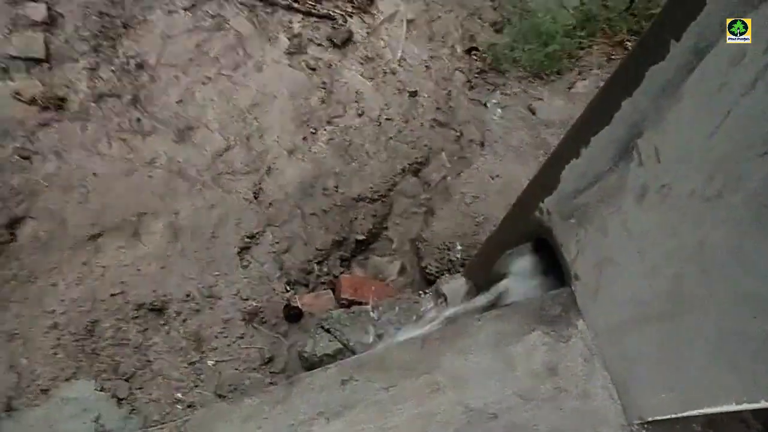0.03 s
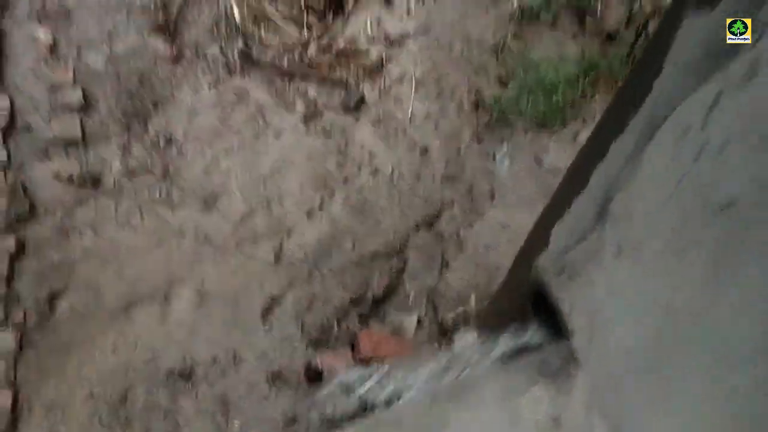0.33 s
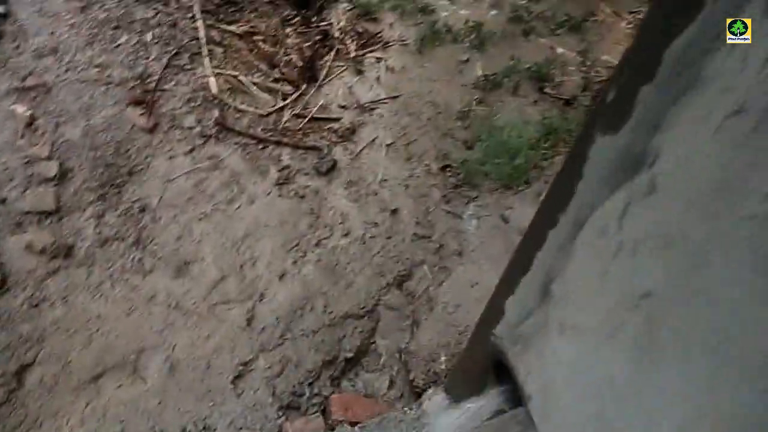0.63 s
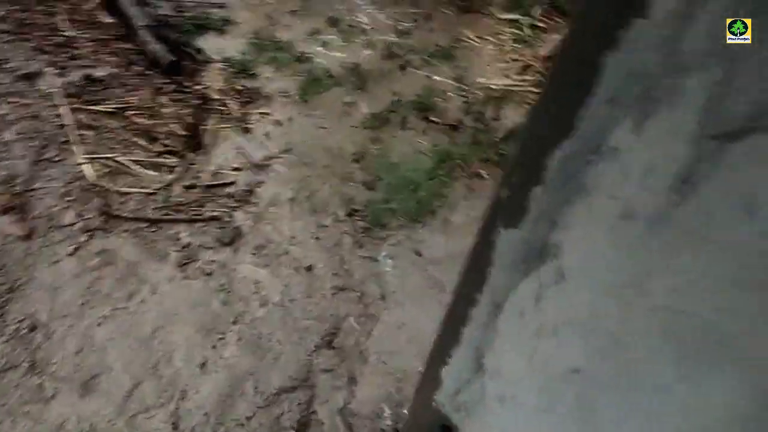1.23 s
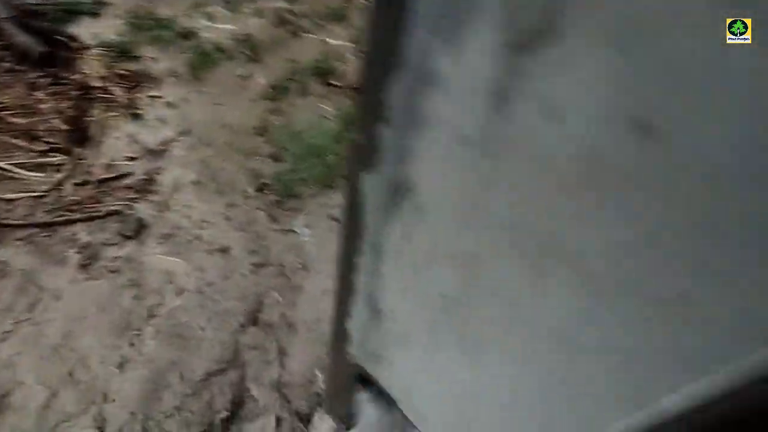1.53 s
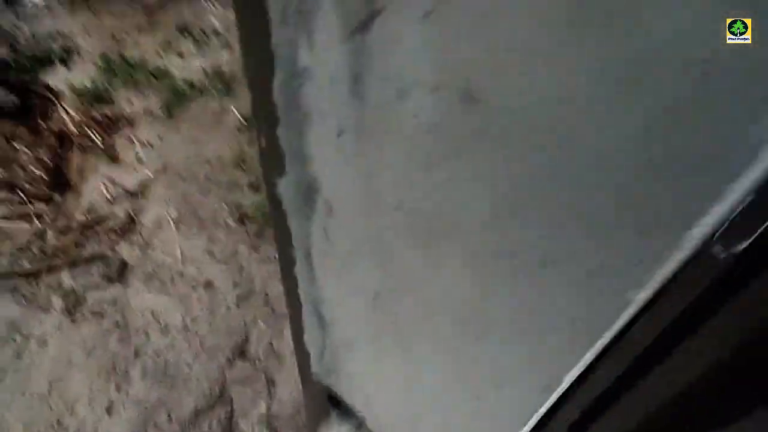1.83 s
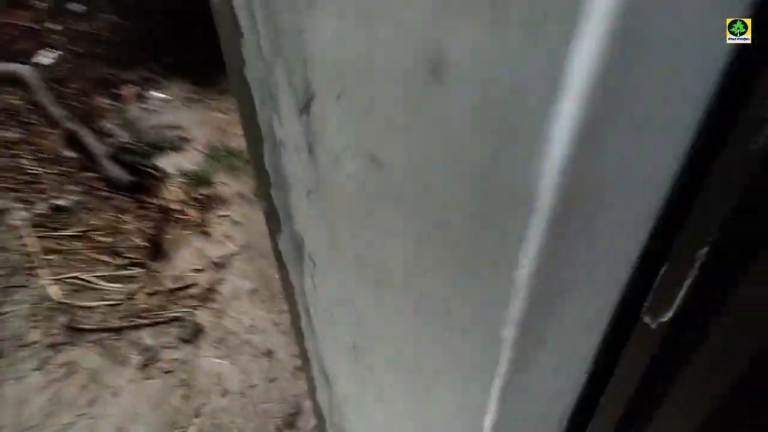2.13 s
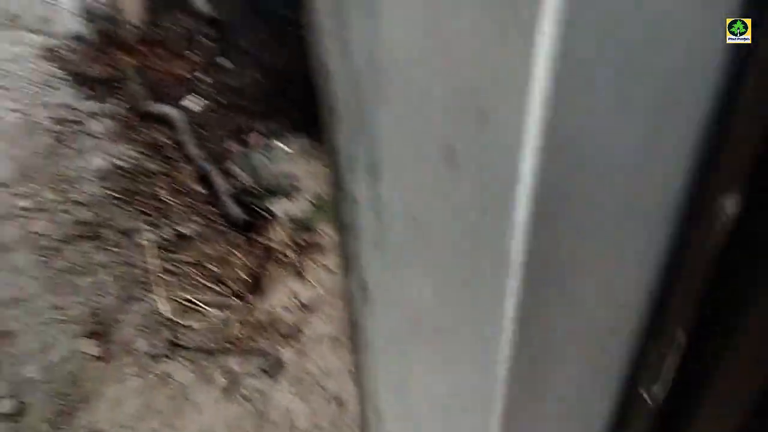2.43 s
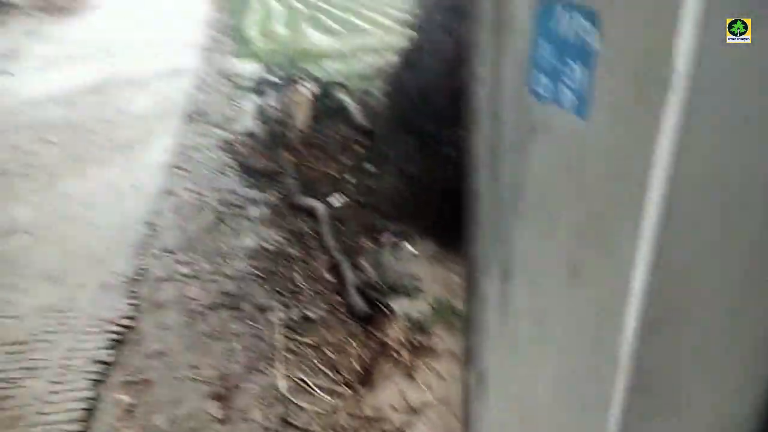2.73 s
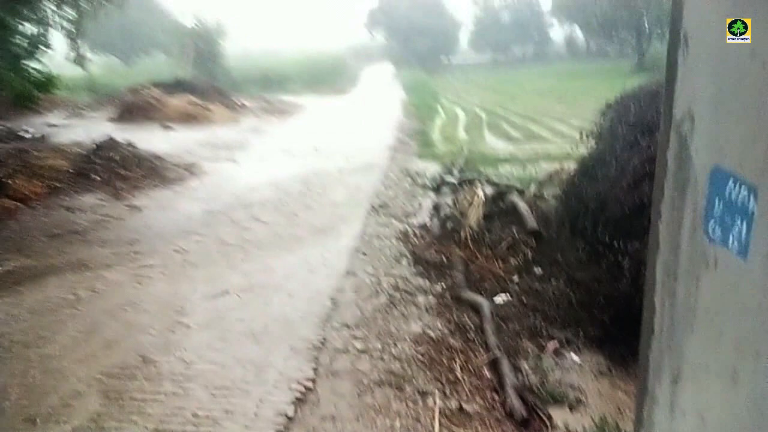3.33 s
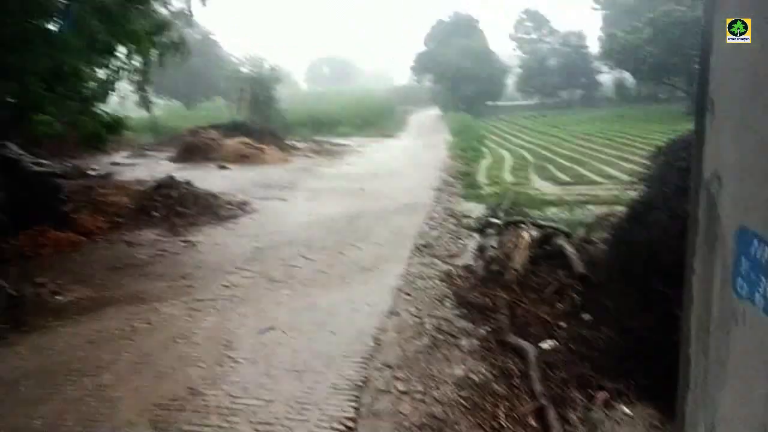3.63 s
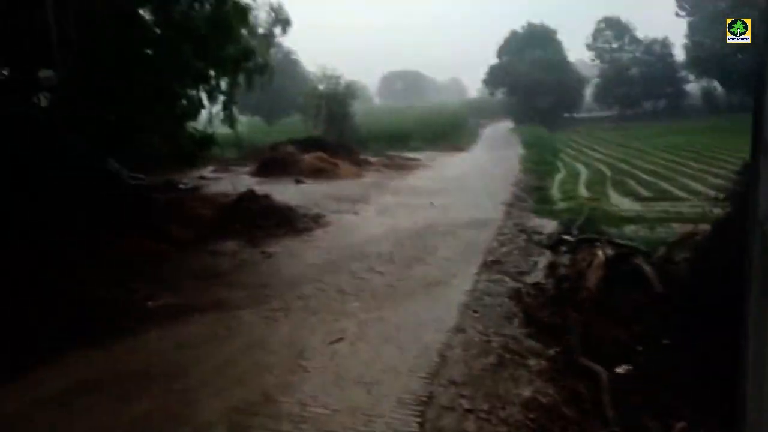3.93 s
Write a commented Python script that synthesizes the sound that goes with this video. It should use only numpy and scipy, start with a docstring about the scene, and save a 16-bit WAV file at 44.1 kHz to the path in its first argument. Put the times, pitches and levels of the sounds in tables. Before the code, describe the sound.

Heavy rain with water splashing from a drain, close drips and wind on the microphone.

```python
"""Heavy rain on a village yard, microphone in a doorway, the water mostly to the left. From the start
a drain splashes and gurgles onto the ground and runoff patters into puddles. Fat drips smack down
close by, briefly answered by the house wall; thin trickles ring and spurts slap the ground. Wind
buffets the microphone from about 0.7 s, harder on the right. The patter thickens by 1.6 s; the wind
drops after 2 s and returns at the very end."""
import sys
import numpy as np
from scipy import signal
from scipy.fft import rfft, irfft, next_fast_len
from scipy.io import wavfile
from scipy.ndimage import uniform_filter1d, map_coordinates

SR = 44100
rng = np.random.default_rng(int(sys.argv[2]) if len(sys.argv) > 2 else 0)


def put_to_file(sound):
    """Save the sound as 16-bit audio at rate SR, in the file named by the first command-line argument."""
    columns = np.atleast_2d(sound).T  # one column per channel
    safe = np.clip(columns, -1, 1)
    whole_steps = np.round(safe * 32767)
    wavfile.write(sys.argv[1], SR, whole_steps.astype(np.int16))


N = 176400

# Course of each steady source at the microphone: t/s, relative level/dB
WIND_LEVEL = [(0, -42.5), (.28, -44), (.6, -38), (.8, -35.5), (1.13, -38.5), (1.25, -37), (1.66, -37.5),
              (1.78, -40.5), (2.3, -52.5), (2.55, -48.5), (3.55, -55), (4, -38.5)]
RAIN_LEVEL = [(0, -45), (1, -46.5), (1.3, -43.5), (2.75, -45.5), (3.3, -42.5)]
SPLASH_LEVEL = [(0, -40.5), (.65, -38.5), (1.01, -39), (1.45, -36), (1.58, -37.5), (2.6, -40), (4, -41.5)]
GURGLE_LEVEL = [(0, -50.5), (.37, -49), (.68, -52.5), (.81, -40.5), (.99, -58), (1.1, -46), (1.37, -43),
                (1.47, -50.5), (1.62, -41.5), (1.95, -48.5), (2.15, -57.5), (2.45, -60.5), (2.56, -47.5),
                (2.9, -56.5)]
PATTER_LEVEL = [(0, -54.5), (.75, -46.5), (1.4, -54), (1.62, -44.5), (4, -44.5)]
# Tone of each source from the doorway: f/Hz, relative level/dB
WIND_SPECTRUM = [(25, -41), (45, -22.5), (70, -5.5), (125, 2.5), (250, -10.5), (360, -14), (700, -35.5),
                 (1500, -56)]
BUFFET_SPECTRUM = [(25, -43), (70, -2.5), (150, 1), (280, -6.5), (420, -9.5), (600, -30), (1500, -63)]
RAIN_SPECTRUM = [(60, -16), (150, -7), (850, -10.5), (2700, -2), (4500, 4.5), (5600, 4), (6800, 7.5),
                 (8000, 4.5), (9500, 7.5), (10400, 5.5), (11200, -8.5)]
SPLASH_SPECTRUM = [(1200, -29), (3100, -6.5), (4500, 3), (5200, 0.5), (5800, -9), (6600, 6), (7300, 4),
                   (8200, -7), (11000, -34.5)]
BUBBLE_SPECTRUM = [(400, -42), (660, -10), (800, -2), (1220, 2), (1330, -2), (1500, -8), (2500, -24)]
SLOSH_SPECTRUM = [(600, -27), (800, -3.5), (1100, -2), (1550, -7.5), (2100, 0), (3300, 1), (4200, -2),
                  (6000, -23)]
PATTER_SPECTRUM = [(900, -24.5), (1400, -7), (1750, -1.5), (2300, -2), (3200, -6.5), (4500, -13)]
# Decay of the answer from wall and doorway: f/Hz, T60/s
WALL_DECAY = [(200, 0.09), (1500, 0.18), (10000, 0.048)]
# Fat drips close by: t/s, relative level/dB, ring f/Hz
FAT_DRIPS = [(.168, -21, 3730), (.928, -19.5, 3700), (1.094, -26, 4600), (1.354, -22, 7110),
             (1.761, -17, 1150), (1.791, -14, 2030), (1.943, -21.5, 1710), (2.057, -20, 3900),
             (2.650, -27, 1690), (2.685, -23, 1460), (3.213, -26, 1590), (3.297, -18, 1600)]
# Trickles ringing in puddles: start t/s, length/s, f/Hz, relative level/dB
PUDDLE_TRICKLES = [(0.297, 0.12, 1344, -47.5), (0.768, .12, 2060, -44), (1.26, 0.76, 1235, -47.5),
                   (1.678, 0.17, 2730, -43), (2.033, 0.107, 3750, -42), (2.373, 0.15, 1640, -46),
                   (2.607, 0.27, 1840, -47), (2.668, 0.336, 1397, -46.5), (3.053, 0.39, 1667, -45.5),
                   (3.557, 0.13, 3355, -45.5)]
# Spurts slapping the ground: peak t/s, length/s, centre f/Hz, relative level/dB
GROUND_SPURTS = [(0.319, 0.066, 3280, -39.5), (0.621, 0.075, 6600, -36.5), (0.788, 0.13, 2730, -40.5),
                 (0.799, .03, 5900, -35.5), (1.08, 0.081, 3500, -37), (1.095, 0.093, 7100, -37.5),
                 (1.332, 0.053, 3650, -37), (2.263, 0.041, 5540, -39), (2.52, 0.058, 970, -42)]
# Sudden buffets on the microphone: peak t/s, length/s, relative level/dB
MIC_BUFFETS = [(0.668, 0.035, -33), (0.735, 0.071, -29.5), (0.811, 0.064, -34), (1.453, 0.039, -32.5)]

GUST_ABOVE_DB = -43.5  # stronger wind leans to the right
HOLLOW_HALF_DEPTH_HZ = 7700
DRIP_DB, DRIP_LOW_CUT_HZ = -9.5, 760
RING_T60_S, RING_WIDTH_OCT = 0.026, 0.3
CRACK_DB, CRACK_T60_S = -1, 0.0068
SPRAY_DB, SPRAY_T60_S = -13, 0.073
TRICKLE_FADE_S = 0.018
TRICKLE_WIDTH, TRICKLE_WANDER = 0.081, 0.02  # shares of the pitch
SPURT_RISE_SHARE, SPURT_WIDTH_OCT = 0.41, 0.32
BAND_LIMIT_HZ = 11200


def amp(db):
    """Decibels to gain."""
    return 10 ** (np.asarray(db) / 20)


def unit(x):
    """Scale to rms 1."""
    return x / np.sqrt(np.mean(x ** 2) + 1e-20)


def hiss():
    """White noise, unrelated in the two channels."""
    return rng.standard_normal((2, N))


def over_frequency(points, hz):
    """Interpolate (f/Hz, value) points on a log axis."""
    freqs, values = np.transpose(points)
    return np.interp(np.log(hz + 1), np.log(freqs + 1), values)


def over_time(points):
    """Interpolate (t/s, value) points at every sample."""
    times, values = np.transpose(points)
    return np.interp(np.arange(N) / SR, times, values)


def wobble(rate):
    """A smooth random curve, rate knots a second."""
    knots = rng.standard_normal(int(N * rate / SR) + 4)
    return map_coordinates(knots, [np.arange(N) * rate / SR])


def bell(hz, centre_hz, width_oct):
    """A Gaussian band on an octave axis."""
    return np.exp(-.5 * (np.log2((hz + 1) / centre_hz) / width_oct) ** 2)


def filtered(x, response):
    """Filter x by a response given as a function of frequency."""
    size = next_fast_len(N + SR // 2)
    return irfft(rfft(x, size) * response(np.fft.rfftfreq(size, 1 / SR)), size)[..., :N]


def coloured(x, spectrum):
    """x through a causal filter with the given spectrum, at rms 1."""
    def minimum_phase(hz):
        cepstrum = irfft(np.log(amp(over_frequency(spectrum, hz))))
        half = len(cepstrum) // 2
        return np.exp(rfft(np.r_[cepstrum[0], 2 * cepstrum[1:half]], len(cepstrum)))
    return unit(filtered(x, minimum_phase))


def panned(x, left_db):
    """Tip a stereo pair to the left, or to the right if negative."""
    return np.array([x[0] * amp(left_db / 2), x[1] * amp(-left_db / 2)])


def drops(rate, lo_hz, hi_hz, cycles, spread_db, glide, samples):
    """Drops or bubbles all around the microphone: random damped sines that may glide up."""
    pitch, weight, onset, bearing, _ = rng.random((int(rate * N / SR), 5)).T
    hz = lo_hz * (hi_hz / lo_hz) ** pitch[:, None]
    t = np.arange(samples) / SR
    age = hz * t / cycles
    strength = amp(-spread_db * np.log(np.maximum(weight[:, None], .01))) * np.sqrt(hz)
    phase = 2 * np.pi * hz * t * (1 + glide * np.minimum(age, 2) / 2)
    rings = strength * np.exp(-np.pi * age) * np.sin(phase)
    start = (onset * N).astype(int)
    left = start + SR // 2000
    right = start + (bearing * SR / 1000).astype(int)  # within 0.5 ms of the left
    slots = [(arrival[:, None] + np.arange(samples)).ravel() for arrival in (left, right)]
    return unit(np.array([np.bincount(slot, rings.ravel(), N)[:N] for slot in slots]))


def hollow(x, depth_db):
    """Narrow resonances that come and go in the water, a few tenths of a second each."""
    spectra = signal.stft(x, nperseg=2048)[2]
    peaks = rng.standard_normal(spectra.shape[1:])
    for bins, frames in ((5, 8), (3, 4)):
        peaks = uniform_filter1d(peaks, bins, axis=0)
        peaks = uniform_filter1d(peaks, frames, axis=1, mode="wrap")
    taper = 1 / (1 + np.fft.rfftfreq(2048, 1 / SR)[:, None] / HOLLOW_HALF_DEPTH_HZ)
    gain = amp(depth_db * taper * unit(peaks))
    return unit(signal.istft(spectra * gain, nperseg=2048)[1][:, :N])


def wall(x, wet_db):
    """Add the short answer of house wall and doorway, different in each channel."""
    hz, t, spectra = signal.stft(rng.standard_normal((2, SR // 4)), SR, nperseg=256)
    decay = amp(-60 * t / over_frequency(WALL_DECAY, hz)[:, None])
    tail = signal.istft(spectra * decay, SR, nperseg=256)[1]
    tail /= np.linalg.norm(tail[0])
    return x + amp(wet_db) * signal.fftconvolve(x, tail, axes=1)[:, :N]


def wind():
    """Air rumbles on both microphone ports; strong gusts and sudden buffets hit the right one harder."""
    t = np.arange(N) / SR
    level_db = over_time(WIND_LEVEL)
    gust_db = np.maximum(level_db - GUST_ABOVE_DB, 0)
    air = coloured(rng.standard_normal(N) + amp(-9.0) * hiss(), WIND_SPECTRUM)
    bumps = sum(amp(db) * np.exp(-(2 * (t - peak) / length) ** 2) for peak, length, db in MIC_BUFFETS)
    buffets = bumps * coloured(rng.standard_normal(N) + amp(-4.0) * hiss(), BUFFET_SPECTRUM)
    rumble = panned(air, left_db=-.7 * gust_db) * amp(level_db + 1.3 * wobble(16))
    return rumble + panned(buffets, left_db=-12.0)


def rain():
    """Tiny impacts on the mud and concrete of the yard, over the hiss of far rain."""
    ticks = drops(rate=2500, lo_hz=820, hi_hz=10600, cycles=1.12, spread_db=2, glide=0, samples=128)
    sound = coloured(hollow(ticks + amp(0.5) * hiss(), depth_db=5.0), RAIN_SPECTRUM)
    return panned(sound, left_db=7.5) * amp(over_time(RAIN_LEVEL) + 6.5 + 1.3 * wobble(21.986))


def drain_splash():
    """Left of the microphone, the jet from the drain breaks up on the ground in uneven fizz."""
    fizz = drops(rate=1500, lo_hz=2450, hi_hz=8930, cycles=4.0, spread_db=2, glide=0.055, samples=192)
    sound = coloured(hollow(fizz + amp(2.0) * hiss(), depth_db=5.5), SPLASH_SPECTRUM)
    level_db = over_time(SPLASH_LEVEL)
    swing_db = 2.02 * (level_db - level_db.mean())
    return panned(sound, left_db=6.0) * amp(level_db.mean() - 0.5 + swing_db + 0.6 * wobble(39.9))


def drain_gurgle():
    """Each surge of the outflow rings large bubbles ahead and sloshes over the stones to the left."""
    surge = amp(over_time(GURGLE_LEVEL) + 1.83 * wobble(29.65))
    bubbles = drops(rate=400, lo_hz=659, hi_hz=1527, cycles=17.5, spread_db=3, glide=0.086, samples=1200)
    bubbles = wall(bubbles, wet_db=-0.5)
    slosh = drops(rate=1200, lo_hz=687, hi_hz=5300, cycles=9.8, spread_db=3, glide=0.052, samples=600)
    bubbles = coloured(hollow(bubbles, depth_db=2.5), BUBBLE_SPECTRUM)
    slosh = coloured(hollow(slosh, depth_db=7.5), SLOSH_SPECTRUM)
    return surge * (amp(-1.0) * panned(bubbles, left_db=-0.5) + amp(2) * panned(slosh, left_db=4.0))


def runoff_patter():
    """Runoff plinks into puddles, well to the left of the doorway."""
    plinks = drops(rate=900, lo_hz=1217, hi_hz=4160, cycles=11.8, spread_db=2.5, glide=0.06, samples=900)
    sound = coloured(hollow(wall(plinks, wet_db=3), depth_db=4), PATTER_SPECTRUM)
    return panned(sound, left_db=12.5) * amp(over_time(PATTER_LEVEL) - 2.5 + 0.56 * wobble(22.2))


def drips():
    """Close to the microphone, each fat drip cracks, rings in its puddle and throws a little spray."""
    size = SR // 5
    t, hz = np.arange(size) / SR, np.fft.rfftfreq(size, 1 / SR)
    out = np.zeros((2, N + SR))

    def burst(shape, t60):
        noise = rfft(rng.standard_normal((2, size)))
        return unit(irfft(noise * shape, size)) * amp(-60 * t / t60)

    for start, db, ring_hz in FAT_DRIPS:
        narrow = bell(hz, ring_hz, RING_WIDTH_OCT)
        wide = narrow ** .35 / np.hypot(1, (DRIP_LOW_CUT_HZ / (hz + 1)) ** 8)
        ring = burst(narrow, RING_T60_S)
        crack = amp(CRACK_DB) * burst(wide, CRACK_T60_S)
        spray = amp(SPRAY_DB) * burst(wide, SPRAY_T60_S)
        first = int(start * SR)
        out[:, first:first + size] += amp(db + DRIP_DB) * (ring + crack + spray)
    return panned(wall(out[:, :N], wet_db=-4), left_db=7.5)


def trickles():
    """Off to the left, a thin stream keeps a pocket in a puddle ringing, sputtering and wavering."""
    out, t = np.zeros((2, N)), np.arange(N) / SR
    for start, length, hz, db in PUDDLE_TRICKLES:
        gate = np.clip(np.minimum(t - start, start + length - t) / TRICKLE_FADE_S, 0, 1)
        sputter = amp(4 * wobble(70))
        ring = filtered(hiss() * sputter, lambda f: 1 / (1 + 2j * (f - hz) / (TRICKLE_WIDTH * hz)) ** 2)
        clock = np.cumsum(1 + TRICKLE_WANDER * wobble(14)) / SR  # uneven time bends the pitch
        wavering = np.array([np.interp(clock, t, channel) for channel in ring])
        out += amp(db) * gate * unit(wavering)
    return panned(out, left_db=9.0)


def spurts():
    """A thicker slug of water lands left of centre: a quick swell of droplets that dies away."""
    out, t = np.zeros((2, N)), np.arange(N) / SR
    droplets = drops(rate=4000, lo_hz=680, hi_hz=10100, cycles=3.5, spread_db=2, glide=0, samples=192)
    for peak, length, hz, db in GROUND_SPURTS:
        reach = length * np.where(t < peak, SPURT_RISE_SHARE, 1 - SPURT_RISE_SHARE)
        swell = np.exp(-((t - peak) / reach) ** 2)
        band = filtered(droplets, lambda f: bell(f, hz, SPURT_WIDTH_OCT))
        out += amp(db) * swell * unit(band)
    return panned(out, left_db=5.5)


def scene():
    """The yard from the doorway: all the water, and wind on the microphone."""
    water = rain() + drain_splash() + spurts() + drain_gurgle() + runoff_patter() + trickles() + drips()
    return water + wind()


def record(dry):
    """The recorder keeps nothing above its band limit."""
    return filtered(dry, lambda hz: hz < BAND_LIMIT_HZ)


dry = scene()
out = record(dry)
put_to_file(out)
```